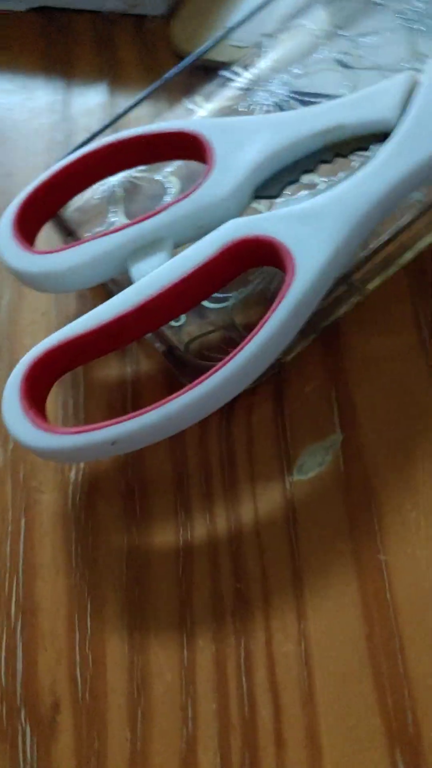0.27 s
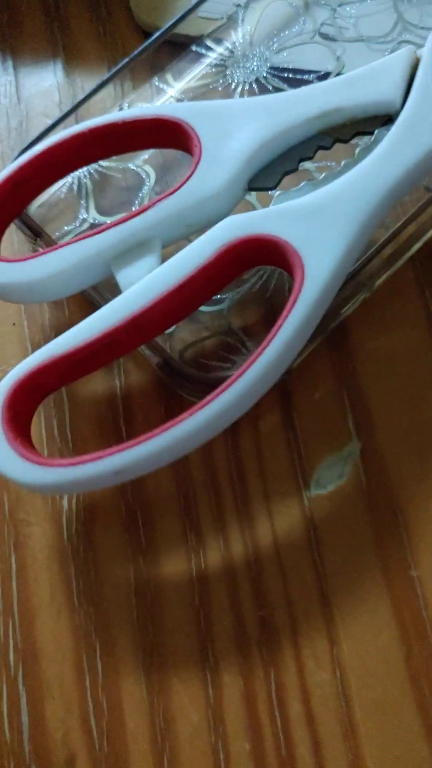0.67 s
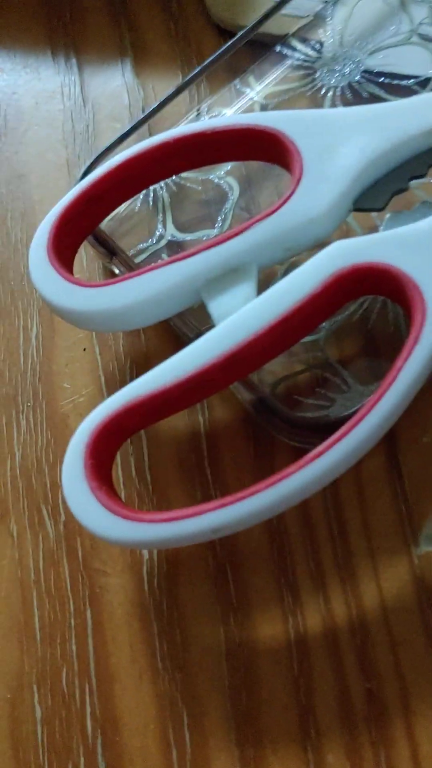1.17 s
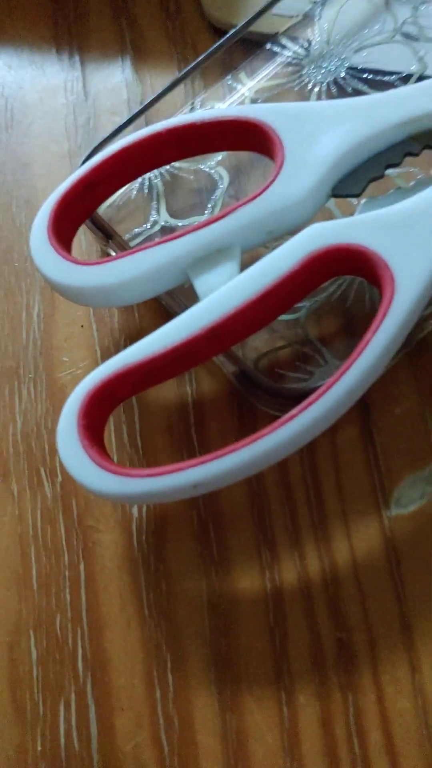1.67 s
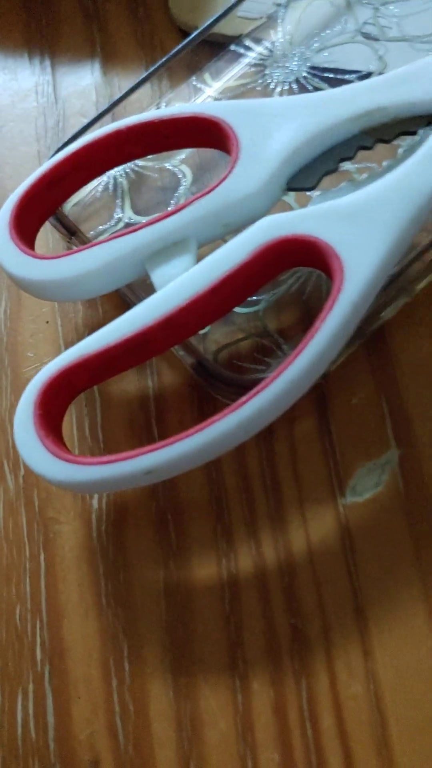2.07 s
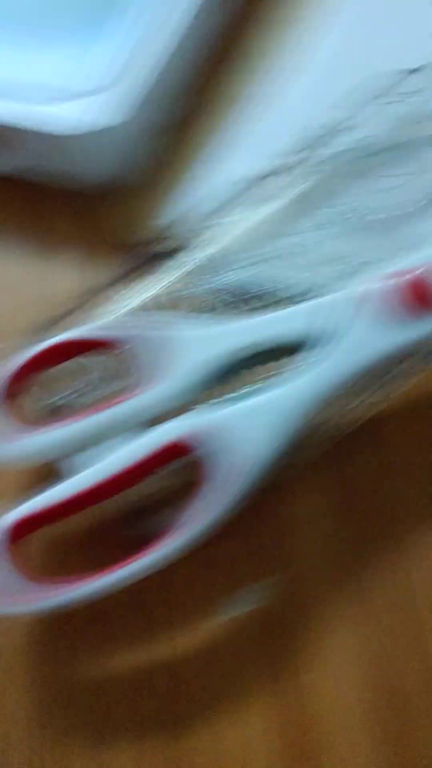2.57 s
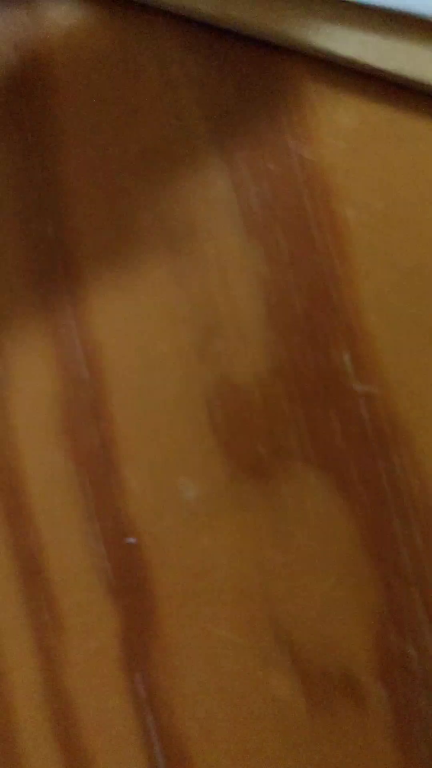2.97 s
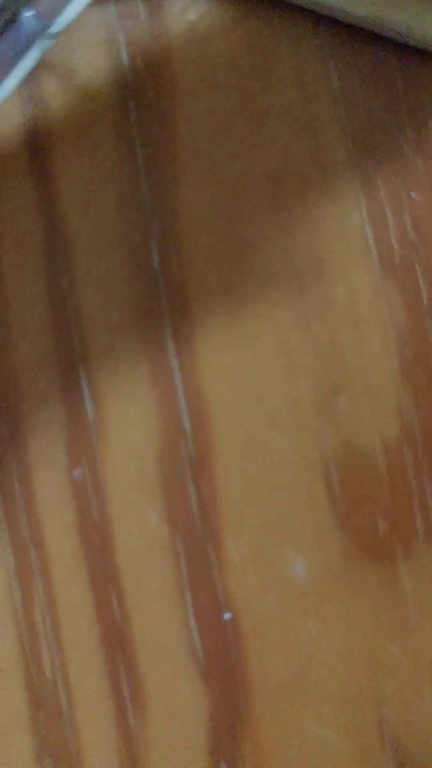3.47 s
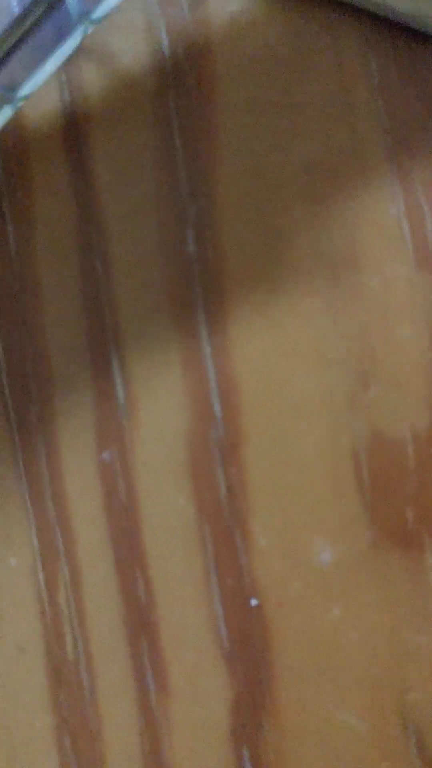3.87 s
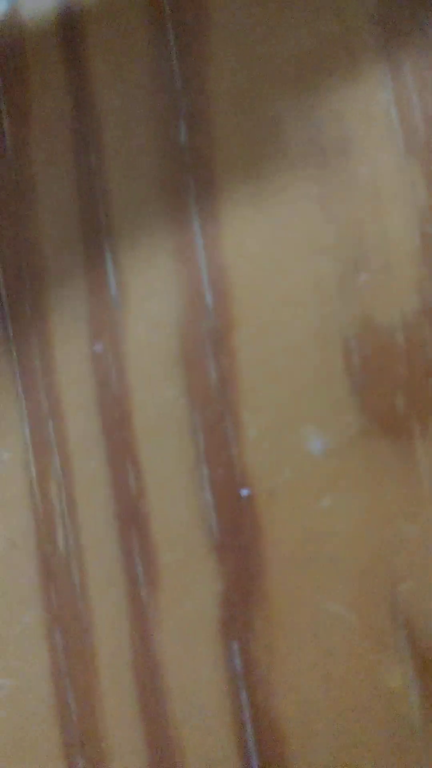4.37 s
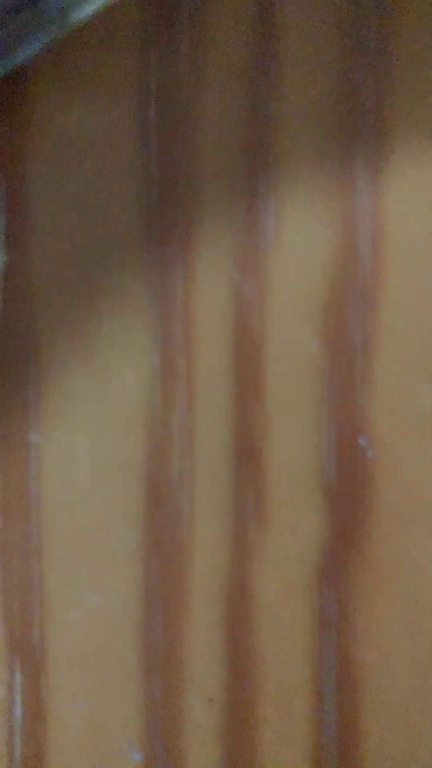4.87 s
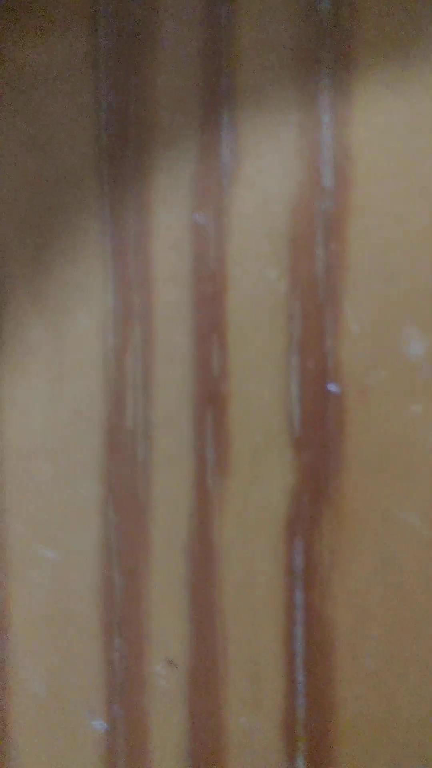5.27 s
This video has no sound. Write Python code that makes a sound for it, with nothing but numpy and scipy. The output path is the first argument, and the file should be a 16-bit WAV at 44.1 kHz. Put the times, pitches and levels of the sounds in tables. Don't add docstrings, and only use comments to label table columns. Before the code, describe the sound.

A quiet small room with low hum and faint hiss; plastic is handled very close to a hand-held stereo phone. For the first 0.9 s there is only faint rubbing and low handling rumble. Dry hard-shell clicks come around 0.95-1.07 s, then a tight cluster at 1.5-1.6 s. Light ticks, rustles and faint skin squeaks at 1.75 and 2.15 s follow, with a soft low knock at 2.5 s. Taps thicken from 2.9 s until a loud, sharp snap at 3.2 s. A lull holds small ticks, then dull case knocks at 3.6-3.85 s. At 3.75 s film is grabbed with a loud crack and dense, bright crumpling, surging again at 4.2 s. Isolated crisp picking clicks span 4.35-5.07 s, with a deep soft thud near 4.5 s. At 5.17 s the film tears in a loud crackling burst with a tiny falling squeal, trailing off in crinkles to 5.5 s.

```python
import sys
import numpy as np
from scipy import signal
from scipy.fft import rfft, irfft, next_fast_len
from scipy.io import wavfile
from scipy.ndimage import uniform_filter1d, map_coordinates

SR = 44100
rng = np.random.default_rng(int(sys.argv[2]) if len(sys.argv) > 2 else 0)


def invert_db(level):
    return 10 ** (np.asarray(level, dtype=float) / 20)


def output_pcm(signal):
    pcm = np.clip(np.atleast_2d(signal).T, -1, 1) * 32767
    wavfile.write(sys.argv[1], SR, np.round(pcm).astype(np.int16))


N = 244314

# pitch_hz, level_db (per Hz)
ROOM_TONE = [(12, -39), (20, -11), (43, 2), (84, -4), (117, -0.5), (212, -72), (382, -20.5), (440, -24.5),
             (479, -18.5), (888, -26.5), (966, -40.5), (1320, -43), (1560, -41.5), (15200, -73),
             (16500, -59.5)]
ROOM_DB = -64
# pitch_hz, level_db (rms)
HUM = [(119, -72), (437, -77.5), (970, -92.5)]
# start_s, level_db
GRIP = [(0, -58.5), (.92, -57.5), (.96, -48), (1.13, -52), (1.18, -67.5), (1.44, -62.5), (1.5, -52),
        (1.7, -63), (2.6, -55), (3.19, -53), (3.3, -60.5), (3.74, -57), (3.78, -27.5), (3.9, -42),
        (4.05, -44), (4.8, -64), (4.88, -49.5), (5.54, -52)]
# start_s, peak_db, pitch_hz, fade_by_60db_s
KNOCKS = [
    (2.518, -44, 120, 0.075),
    (2.525, -34, 125, 0.15),
    (3.635, -21, 118, 0.019),
    (3.785, -25.5, 118, 0.14),
    (3.84, -19.5, 116, 0.041),
    (4.477, -28, 56.5, 0.017),
]
# pitch_hz, level_db (per Hz)
CASE = [(12, -61), (20, -13.5), (43, 0.5), (75, -19), (118, 6), (171, -13), (350, -6.5), (460, -25.5),
        (770, -120)]
# start_s, left_port_delay_ms, left_minus_right_db
PLACE = [
    (0, -0.2, -2.5),
    (1.5, -0.25, 1),
    (2.3, 0.083, 1),
    (2.6, 0.095, -1.5),
    (3.5, 0.323, -4.5),
    (5.54, .32, -3.5),
]
# start_s, length_s, pitch_hz, level_db (rms)
SQUEAKS = [
    (1.732, 0.023, 1350, -57.5),
    (1.77, 0.025, 1370, -53),
    (2.128, 0.074, 790, -51),
    (2.14, 0.071, 2250, -43),
    (5.184, .012, 2900, -18),
    (5.195, 0.013, 2806, -17),
    (5.211, 0.0098, 2740, -17),
]
# pitch_ratio, level_db
SHELL_NOTES = [(1, 13), (1.55, -3), (2.2, 0.5), (.62, -24.5)]
# pitch_hz, level_db (per Hz)
BODY = [(180, -2), (300, 1), (467, -18.5), (572, 0), (1470, 2.5), (2440, 2.5), (2760, 0), (3170, -10.5),
        (4500, -28), (5850, -32.5), (9900, -120)]
# pitch_hz, level_db (per Hz)
FILM = [(2060, -20.5), (3500, -4.5), (4240, -9.5), (4580, -3), (5260, -8.5), (6750, -1), (7450, -10),
        (8590, -11.5), (11300, -45), (14700, -61), (22000, -120)]
# pitch_hz, level_db (per Hz)
AIR = [(6650, -18.5), (11300, -10.5), (12100, -7), (15000, -11), (15900, -29), (16800, -12.5)]
# pitch_hz, level_db
CAPSULE_TONE = [(600, 3), (1200, 3.5), (3000, 1.5), (5000, -3.5), (6800, -1), (9000, -6), (13000, -1.5)]
WRAPPERS_FROM_S = 3.7

# start_s, level_db
TOUCH = [(0, -48), (.26, -60.5), (1.13, -57), (1.17, -62), (1.44, -78.5), (1.7, -56.5), (2.3, -62.5),
         (2.8, -54), (3.3, -57), (3.5, -55), (3.72, -58.5), (3.8, -46), (5.54, -50.5)]
TOUCH_FILM_DB, TOUCH_TOP_DB = -10, -67.5
# start_s, hold_s, shell_db, film_over_shell_db, top_over_film_db
CAPSULE_STROKES = [(0, 0.076, -57.5, -39, -20), (.955, 0.038, -53, -3.5, -6), (1.01, 0.079, -58, -14, -19),
                   (1.47, 0.03, -46, -10, -2.5), (1.555, 0.027, -45, -26, -18),
                   (1.612, 0.034, -53, -3.5, 3), (1.75, 0.006, -64.5, -4, 7), (1.83, 0.028, -51, -16, 2),
                   (1.975, 0.006, -51.5, 7, -11), (2.115, 0.064, -48.5, 3.5, -5),
                   (2.3, 0.02, -61.5, -24, -10), (2.375, 0.06, -52.5, -6, -6), (2.53, 0.011, -64.5, -4, -2),
                   (2.55, 0.087, -63, -16, -9), (2.66, 0.11, -62.5, 5, -12), (2.87, 0.063, -53, -12, -3),
                   (2.945, 0.12, -46.5, -7, -33), (3.22, 0.066, -57.5, -3, -24),
                   (3.595, 0.0066, -44, -6.5, -26)]
# start_s, hold_s, shell_db, film_over_shell_db, top_over_film_db
WRAPPER_STROKES = [(3.755, 0.058, -36.5, -10, -10), (3.83, 0.052, -40, -10, -14), (3.935, 0.05, -35, 0, 4),
                   (4.03, 0.095, -50, 1, -6), (4.19, 0.025, -39, -2.5, 3), (4.21, 0.02, -22.5, -7, -13),
                   (4.375, 0.0075, -29.5, -9.5, -26), (4.62, 0.01, -58.5, 6.5, -20),
                   (4.76, 0.062, -61, 4.5, -32), (4.87, 0.13, -52.5, -9, -27), (5.03, .06, -53, 0, -15),
                   (5.172, 0.056, -26.5, -3, -8), (5.24, 0.018, -42.5, -11, -13),
                   (5.33, 0.098, -37, 0.5, -6), (5.5, 0.051, -41.5, -6, -7)]
CAPSULE_RISE_DB_S, CAPSULE_FALL_DB_S = 844, 330.5
WRAPPER_RISE_DB_S, WRAPPER_FALL_DB_S = 905, 633
PATCH_HZ, PATCH_OCTAVES_PER_DB = 1253, 0.3658

# start_s, peak_db, pitch_hz, crack_over_ring_db, length_ms
LEFT_TAPS = [(.9471, -19.5, 1840, -9, 12.5), (1.0357, -29.5, 2080, -32, 4.1), (1.0611, -41, 1540, -7, 21),
             (1.0709, -28.5, 2050, -13, 1.15), (2.1202, -36, 2080, 4, 3), (2.1535, -22, 2140, -2.5, 12.3),
             (2.1735, -33, 2100, 3, 6.6), (2.385, -41, 730, -18, 3.7), (2.518, -46.5, 2430, -7, 8.3),
             (2.9702, -24.5, 1010, -28, 2.1), (2.9862, -33, 1180, -10.5, 18),
             (3.0354, -15.5, 1740, -11, 4.1), (3.0424, -31, 2150, -9, 5.8)]
# start_s, peak_db, pitch_hz, crack_over_ring_db, length_ms
RIGHT_TAPS = [(.166, -41.5, 650, -42, 13), (1.502, -29, 1870, -41, 2.7), (1.527, -28.5, 1290, -38, 1.7),
              (1.5495, -24.5, 1780, -30, 7), (1.5919, -19, 860, -10.5, 3.9), (1.5922, -18, 1970, -20, 2.96),
              (1.8042, -28, 1490, -16, 3.4), (2.4347, -35.5, 860, -30, 7.3),
              (2.6586, -33.5, 1480, -13, 5.6), (2.7551, -36, 850, -15, 6.6),
              (2.9313, -23.5, 1330, -50, 7.3), (3.098, -34, 800, -19.5, 24.6),
              (3.2025, -2.5, 1933, -3, 3.57), (3.2028, -14.5, 793, -23, 3.8), (3.226, -32.5, 1076, 5.5, 2),
              (3.332, -58, 1310, 7.5, 4.6), (3.4412, -50.5, 2440, 2.5, 5.6), (3.509, -47.5, 1440, -20, 14),
              (3.5813, -21, 2920, -5, 5.3), (3.5941, -38.5, 1280, 6, 8.4)]
# start_s, peak_db, pitch_hz, crack_over_ring_db, length_ms
CAPSULE_TICKS = [(1.566, -32.5, 604, -25, 1.95), (1.598, -17.5, 1270, -31, 3.9),
                 (1.61, -41, 1020, -23, 3.3), (1.709, -48, 1350, -4, 4.7), (1.841, -42, 557, -26, 1.6),
                 (1.977, -39.5, 1320, -7, 6.5), (2.105, -49, 759, -18, 5.2), (2.141, -29, 2250, -19, 3.8),
                 (2.344, -45.5, 600, -29, 3.2), (2.422, -39.5, 1170, -2, 6.2),
                 (2.444, -36.5, 660, -24, 8.3), (2.579, -40.5, 670, -21, 5), (2.885, -38.5, 488, -6, 8.2),
                 (2.911, -26.5, 1700, -28, 1.9), (2.941, -28.5, 806, -22, 3.3), (2.955, -27.5, 725, -22, 6),
                 (2.997, -35, 2030, -19, 2.7), (3.005, -27, 1090, -13, 4.3), (3.018, -33, 1000, -18, 3.2),
                 (3.111, -33, 960, -19, 3.1)]
# start_s, peak_db, pitch_hz, crack_over_ring_db, length_ms
CRUMPLE = [(3.7649, -0.5, 1337, -5.5, 4.8), (3.7763, -16, 1510, -4, 6.9), (3.7882, -3, 2440, -12, 3.7),
           (3.801, -8, 2100, -6.5, 11.7), (3.8535, -16.5, 1630, -18, 4.4), (3.89, -26, 635, -19, 6.2),
           (3.9367, -19, 2840, -4, 3.2), (3.945, -17.5, 2770, -9, 7.1), (3.971, -19.5, 2130, 1.5, 5.9),
           (3.9942, -21, 1690, -7, 13.8), (4.0393, -12, 2240, -26, 6.8), (4.0459, -18, 1720, -1.5, 3.4),
           (4.0608, -19.5, 1870, -4.5, 13.7), (4.0863, -39, 1650, 1, 2.1), (4.096, -18, 2820, 4, 5.2),
           (4.1192, -16, 1430, -1.5, 4.8), (4.1574, -16.5, 1600, 1.5, 2.8), (4.1866, -34, 1950, 4.5, 6.2),
           (4.2121, -6, 1240, -22, 4.2), (4.2245, -2, 1370, -8.5, 10.8), (4.2318, -5, 1380, -2.5, 4.2)]
# start_s, peak_db, pitch_hz, crack_over_ring_db, length_ms
CRUMPLE_TICKS = [(3.7485, -45, 1350, -4, 1.8), (3.758, -21, 1510, -20, 4.8), (3.77, -9, 2700, -10, 2.8),
                 (3.7797, -9, 1600, -2, 4.6), (3.8054, -10.5, 1950, -2, 4.2), (3.8386, -24, 990, -5, 3.8),
                 (3.8427, -32, 1150, 2, 4), (3.862, -39, 1480, 4, 2), (3.8748, -33, 1950, 2.5, 2.9),
                 (3.902, -35, 1880, 3, 3), (3.9103, -30.5, 2580, 3.5, 3.6), (3.922, -27, 2640, -5, 2),
                 (3.9295, -28, 2600, 2, 4), (3.9527, -24, 2920, -12, 4.5), (3.9587, -26, 2830, -2, 2.1),
                 (3.9655, -21, 2750, 0, 1.9), (3.9828, -25, 1850, -7, 5.2), (3.9894, -31, 1630, 7, 3.4),
                 (3.9999, -27.5, 1550, 4, 2), (4.0054, -22.5, 1280, -1, 1.5),
                 (4.0137, -27, 1660, -2.5, 3.6), (4.0525, -31, 2980, -10, 8.1),
                 (4.0662, -16.5, 2920, -3, 3.5), (4.072, -27, 2820, 4, 6), (4.1064, -21, 1450, -1, 4.2),
                 (4.1157, -25, 1390, 1, 2.8), (4.1355, -27.5, 1620, 3.5, 5.4),
                 (4.1605, -17, 1770, -10, 1.8), (4.1694, -22, 1320, 0.5, 4), (4.1803, -28, 1370, 5, 3.1),
                 (4.197, -16, 1320, -3, 5), (4.2076, -10.5, 1560, -8, 5.4), (4.2798, -37.5, 1140, 3.5, 2.5),
                 (4.3346, -35, 1370, -6, 3), (4.389, -27, 1250, -8, 6.1)]
# start_s, peak_db, pitch_hz, crack_over_ring_db, length_ms
PICK = [(4.3673, -16, 910, -26, 4.3), (4.3749, -13.5, 1870, -6, 3.4), (4.383, -9, 1290, -10, 3.2),
        (4.398, -33.5, 4000, 13.5, 3.9), (4.4089, -18.5, 1730, 3, 2.65), (4.478, -16, 3150, 0.5, 2.2),
        (4.608, -10, 1360, -17, 4.1), (4.7146, -9, 1190, -18.5, 3.7), (4.7892, -33.5, 1370, -9, 11),
        (4.8715, -24, 1430, -11, 2.3), (4.8744, -18, 1450, -19, 11), (4.9118, -22.5, 1360, -12, 2),
        (4.9355, -19, 900, -20, 4.7), (5.068, -11, 1410, -5, 5.8)]
# start_s, peak_db, pitch_hz, crack_over_ring_db, length_ms
TEAR = [(5.1426, -19.5, 1440, -7, 5), (5.1667, -13, 3380, 1, 1.45), (5.175, 2.5, 3180, -11, 5.2),
        (5.1866, -7.5, 1530, -11, 9.3), (5.202, -11, 875, -6.5, 20), (5.2092, -4.5, 1500, -7, 6.2),
        (5.2422, -7, 1340, -20, 5.9), (5.278, -30, 1690, 8.5, 6.3), (5.2979, -20.5, 1000, 3.5, 2.6),
        (5.3104, -18.5, 1560, 4.5, 3.8), (5.3247, -14.5, 2840, -14, 6.3), (5.342, -10.5, 2460, -9, 4.5),
        (5.353, -21.5, 1030, 4, 6.7), (5.3716, -20.5, 1320, -0.5, 6.3), (5.4208, -25, 1010, -4.5, 8.4),
        (5.497, -15, 2000, -4.5, 3.8), (5.5083, -28, 1950, -1, 4.9), (5.5359, -22, 1360, 0, 5.7)]
# start_s, peak_db, pitch_hz, crack_over_ring_db, length_ms
TEAR_TICKS = [(4.5087, -30.5, 1240, -2.5, 4.4), (4.5524, -39, 1170, 2.5, 1.8),
              (4.6618, -36.5, 810, -0.5, 2.9), (4.7304, -24, 1590, -7, 5.6), (4.7721, -30, 3220, -13, 3.7),
              (4.8074, -36, 3140, -8, 2.7), (4.8254, -47, 3220, -10, 2.2), (5.029, -44, 1450, -2, 3),
              (5.078, -33, 1500, 1, 3.1), (5.132, -25.5, 3010, -6, 2.9), (5.1514, -34, 3100, -5, 4.9),
              (5.1712, -7, 3400, -2.5, 3.9), (5.1804, -8, 2790, -4, 5.4), (5.1904, -8, 1220, -8, 2.5),
              (5.1964, -7, 1590, -11, 3.7), (5.2054, -10.5, 1240, -0.5, 2.8),
              (5.2199, -15.5, 1200, -2, 5.4), (5.2364, -29, 1440, 1, 2.8), (5.2554, -22, 1350, -15, 2.3),
              (5.3304, -22, 1120, -1, 4.4), (5.3614, -18, 2730, -3, 3.7), (5.3894, -27, 1140, 2, 3.8),
              (5.4094, -30, 1030, -6, 3.3), (5.4344, -27.5, 960, 0.5, 5), (5.4464, -38.5, 1130, 6, 1.6),
              (5.4534, -42, 890, 7, 3.5), (5.5034, -26, 1880, 0.5, 2.6), (5.5244, -22.5, 1050, -11, 1.7)]
LEFT_PAN_DB, RIGHT_PAN_DB, CREASE_PAN_DB, TICK_PAN_DB = 7, -12, -9.5, -3.5
PAN_SCATTER_DB = 2
# pitch_hz, left_minus_right_db
PORTS = [(60, 5.5), (200, 0), (700, 1.5), (1300, -4), (2400, 0.5), (4400, 0), (6800, 9.5), (9000, 0.5),
         (15000, 2.5)]


def colour(x, shape, share=1):
    hz, db = np.transpose(shape)
    size = next_fast_len(N + 8192)
    f = np.maximum(np.arange(size // 2 + 1) * SR / size, 1)
    gain = invert_db(share * np.interp(np.log(f), np.log(hz), db))
    return irfft(rfft(x, size) * gain, size)[..., :N]


def unit(x):
    return x / np.sqrt(np.mean(x ** 2))


def curve(table, column):
    rows = np.array(table)
    return np.interp(np.arange(N) / SR, rows[:, 0], rows[:, column])


def walk(rate):
    k = int(SR / rate)
    steps = np.repeat(rng.standard_normal(N // k + 1), k)
    return unit(uniform_filter1d(uniform_filter1d(steps, k), k)[:N])


def grains(rate, spread_db, smear_ms):
    happens = rng.random(N) < rate / SR
    sizes = happens * invert_db(spread_db * np.minimum(rng.exponential(size=N), 2.2))
    return unit(signal.lfilter([1], [1, -np.exp(-1000 / (smear_ms * SR))], sizes))


def sides(x, pan_db):
    return x * invert_db(np.array([pan_db, -pan_db]) / 2)


def room_tone():
    mid, side = (unit(colour(rng.standard_normal(N), ROOM_TONE)) for _ in range(2))
    side = colour(side, [(30, -5.5), (120, -26.0), (300, -10.0), (1000, 5.5)])
    t = np.arange(N) / SR
    hum = sum(np.sqrt(2) * invert_db(db + 1.6 * walk(6.36)) * np.sin(2 * np.pi * hz * t) for hz, db in HUM)
    hiss = mid + side * np.array([[1], [-1]])
    return invert_db(ROOM_DB + 0.89 * walk(0.81)) * hiss + hum


def handling(alike=0.84):
    mid, side = (unit(colour(rng.standard_normal(N), CASE)) for _ in range(2))
    shared = np.sqrt(1 + alike) * mid
    opposed = np.sqrt(1 - min(alike, .99)) * side * np.array([[1], [-1]])
    rumble = (shared + opposed) / np.sqrt(2)
    rumble = rumble * invert_db(curve(GRIP, 1) + 1.5 * walk(30))
    t = np.arange(N) / SR
    for s, db, hz, t60 in KNOCKS:
        age = np.maximum(t - s, 0)
        rumble = rumble + invert_db(db) * np.sin(2 * np.pi * hz * age) * np.exp(-np.log(1000) * age / t60)
    return rumble


def squeaks(width=0.059):
    t, out = np.arange(N) / SR, 0
    for s, length, hz, db in SQUEAKS:
        narrow = [(hz * (1 - 3 * width), -40), (hz, 0), (hz * (1 + 3 * width), -40)]
        note = unit(colour(rng.standard_normal(N), narrow))
        out = out + invert_db(db) * note * np.exp(-((t - s) / (length / 2)) ** 4)
    return out


def effort():
    t, rest = np.arange(N) / SR, curve(TOUCH, 1)
    film_rest = rest + TOUCH_FILM_DB
    gain = np.array([invert_db(rest), invert_db(film_rest), invert_db(film_rest - 14.0) + invert_db(TOUCH_TOP_DB)])
    stages = ((CAPSULE_STROKES, CAPSULE_RISE_DB_S, CAPSULE_FALL_DB_S),
              (WRAPPER_STROKES, WRAPPER_RISE_DB_S, WRAPPER_FALL_DB_S))
    for strokes, rise, fall in stages:
        for s, hold, *steps_db in strokes:
            shape_db = -rise * np.maximum(s - t, 0) - fall * np.maximum(t - s - hold, 0)
            gain = gain + invert_db(np.cumsum(steps_db))[:, None] * invert_db(np.maximum(shape_db, -200))
    return 20 * np.log10(gain)


def rubbing(wide=2.67, soft_db=-62, patchy_db=7.0, focus_db=0.5):
    shell_db, film_db, top_db = effort()
    patch_hz = PATCH_HZ * 2 ** (PATCH_OCTAVES_PER_DB * (shell_db + 42.0))
    force = np.clip((shell_db - soft_db) / 20, 0, 1)
    slips = force * grains(600, 3.4, 2.8) + .5 + (1 - force)
    fine = 0.16 * slips + .5 * force * grains(4400, 3.3, 0.75)
    noise = rng.standard_normal((3, 1, N)) + wide * rng.standard_normal((3, 2, N))
    rattle = colour(noise[0] * slips, BODY) / slips.mean()
    shell = 0
    for hz in 400 * 1.664 ** np.arange(7):
        patch_db = patchy_db * force * walk(25) - focus_db * np.log2(hz / patch_hz) ** 2
        peak = [(hz / 4, -40), (hz / 1.14, -6), (hz, 0), (hz * 1.18, -6), (hz * 4, -40)]
        shell = shell + invert_db(patch_db) * colour(rattle, peak)
    waver_db = 1.6
    body = unit(shell) * invert_db(shell_db + waver_db * walk(40))
    film = unit(colour(noise[1] * fine, FILM)) * invert_db(film_db + waver_db * force * walk(27))
    air = unit(colour(noise[2] * fine, AIR)) * invert_db(top_db + waver_db * force * walk(30))
    return invert_db(waver_db * force * walk(70)) * (body + film + air) * sides(0.8, curve(PLACE, 2))


def clicks(wide=1.0, detune=0.055, crack_db=8, crack_share=0.42, top_db=-3, top_slope=0.78):
    t = np.arange(1536) / SR
    cycles, ring_db, rattle_db = 2.2, 2, -3
    hands = ((LEFT_TAPS, LEFT_PAN_DB), (RIGHT_TAPS, RIGHT_PAN_DB), (CRUMPLE, CREASE_PAN_DB),
             (PICK, CREASE_PAN_DB), (TEAR, CREASE_PAN_DB), (CRUMPLE_TICKS, CREASE_PAN_DB),
             (TEAR_TICKS, CREASE_PAN_DB), (CAPSULE_TICKS, TICK_PAN_DB))
    events = [(*row, pan_db) for rows, pan_db in hands for row in rows]
    chance = rng.standard_normal((len(events), 5, len(t)))
    ring, rattle, crack, top = np.zeros((4, 2, N + len(t)))
    for (s, db, hz, bright_db, ms, pan_db), (hit, shake, snap, *own) in zip(events, chance):
        at = slice(int(s * SR), int(s * SR) + len(t))
        ports = sides(0.81, pan_db + PAN_SCATTER_DB * shake[-1])[:, None]
        age = t * 1000 / max(ms, 1) / 0.21
        push = age * np.exp(1 - age)
        modes = 0
        for k, (ratio, mode_db) in enumerate(SHELL_NOTES):
            note = np.sin(2 * np.pi * hz * ratio * (1 + detune * hit[-k - 1]) * t)
            modes = modes + invert_db(mode_db) * note * np.exp(-hz * ratio * t / cycles)
        first = np.arange(len(t)) == np.argmax(push) // 2
        blow = hit * push ** 2 + 6 * np.sqrt(ms) * first
        rung = signal.fftconvolve(blow, modes)[:len(t)]
        ring[:, at] += ports * invert_db(db + ring_db) * rung / np.abs(rung).max()
        rattle[:, at] += ports * invert_db(db + rattle_db) * shake * push
        sharp = (snap + wide * np.array(own)) * push ** (1 / crack_share)
        burst = ports * invert_db(db + bright_db + crack_db) * sharp
        crack[:, at] += burst
        top[:, at] += burst * invert_db(top_slope * bright_db)
    ring = colour(ring[:, :N], [(100, -16.0), (450, -0.5)])
    bright = colour(crack[:, :N], FILM) + invert_db(top_db) * colour(top[:, :N], AIR)
    return ring + colour(rattle[:, :N], BODY) + bright


def echoes(x, tail_db=-22, t60=0.21):
    t = np.arange(SR // 2) / SR
    table_db, table_ms = -12, 2.5
    near, far = rng.standard_normal((2, 2, len(t)))
    near = near * np.exp(-t * 1000 / table_ms) * (t > .001)
    far = signal.lfilter([1], [1, -.75], far) * np.exp(-np.log(1000) * t / t60) * (t > .006)
    response = invert_db(table_db) * near / np.linalg.norm(near[0]) + invert_db(tail_db) * far / np.linalg.norm(far[0])
    return signal.fftconvolve(x.mean(axis=0, keepdims=True), response, axes=1)[:, :N]


def scene():
    plastic = clicks() + rubbing() + squeaks()
    capsule_time = np.arange(N) < WRAPPERS_FROM_S * SR
    plastic = np.where(capsule_time, colour(plastic, CAPSULE_TONE), plastic)
    lag = curve(PLACE, 1) * SR / 2000
    left = map_coordinates(plastic[0], [np.arange(N) - lag], order=3)
    right = map_coordinates(plastic[1], [np.arange(N) + lag], order=3)
    return np.array([left, right]) + echoes(plastic) + handling() + room_tone()


def low_pass(x):
    return signal.sosfilt(signal.butter(12, 16990, fs=SR, output="sos"), x)


def record(dry):
    ports = np.array([colour(dry[0], PORTS, 0.3), colour(dry[1], PORTS, -0.54)])
    ports = ports / (1 + ports ** 4) ** .25
    ports = colour(ports, [(10200, -2.0), (11100, -11), (11900, -5.5), (15900, 1.5), (16100, -24), (16900, -35.0)])
    return low_pass(ports)


dry = scene()
out = record(dry)
output_pcm(out)
```